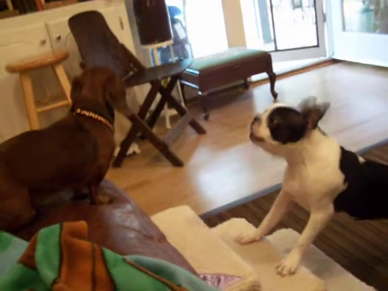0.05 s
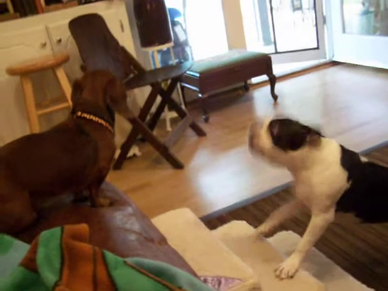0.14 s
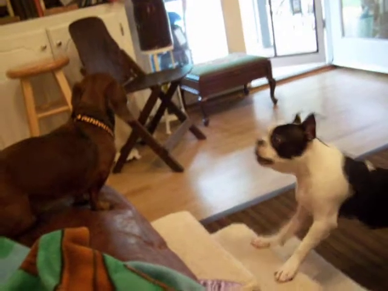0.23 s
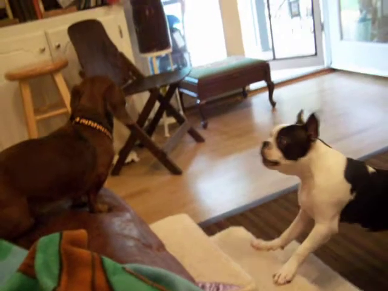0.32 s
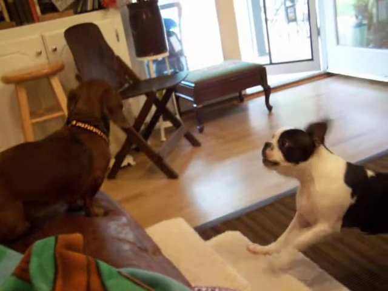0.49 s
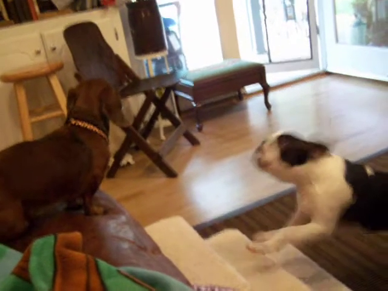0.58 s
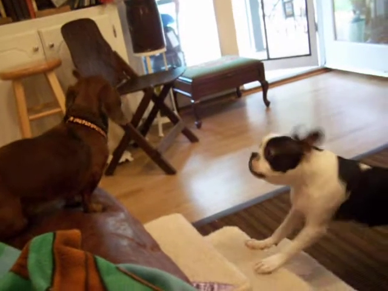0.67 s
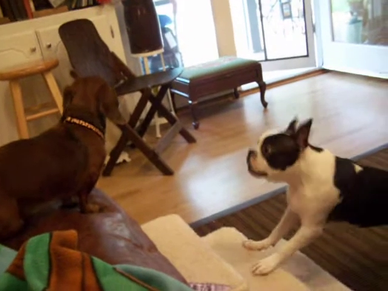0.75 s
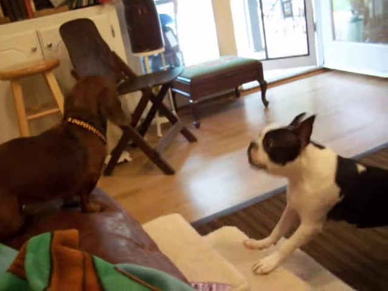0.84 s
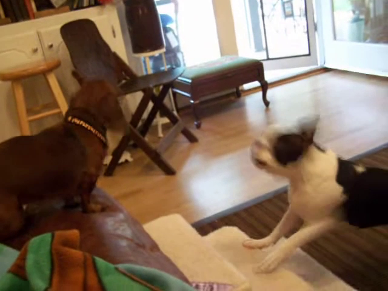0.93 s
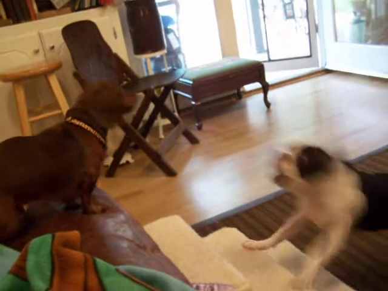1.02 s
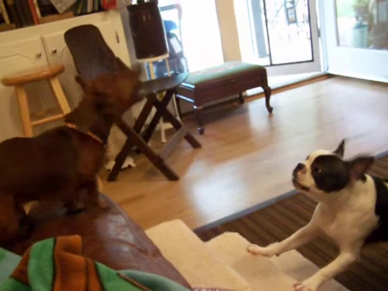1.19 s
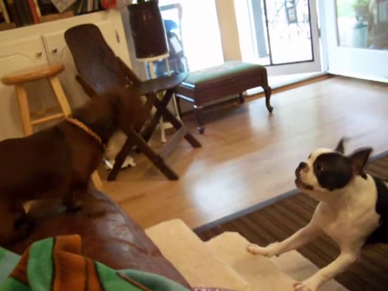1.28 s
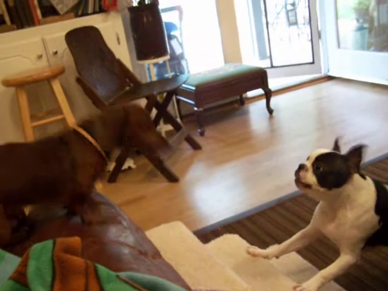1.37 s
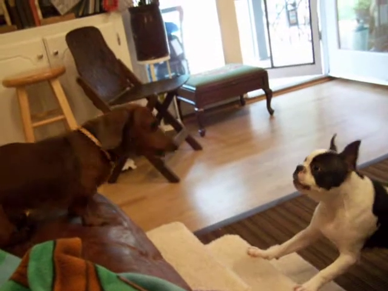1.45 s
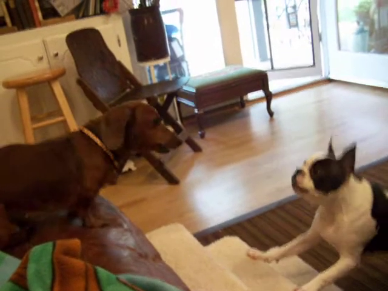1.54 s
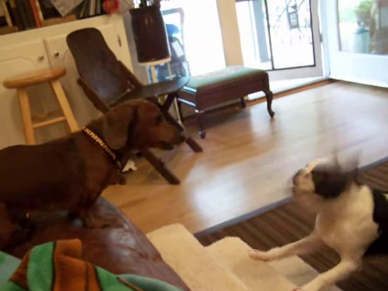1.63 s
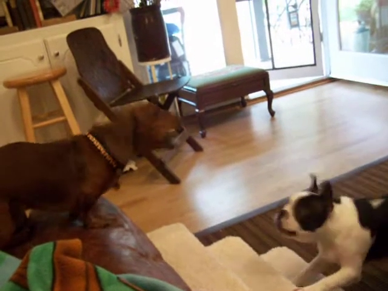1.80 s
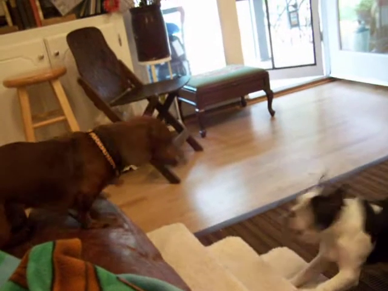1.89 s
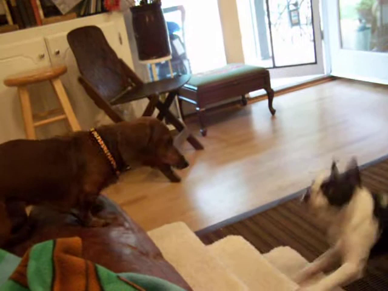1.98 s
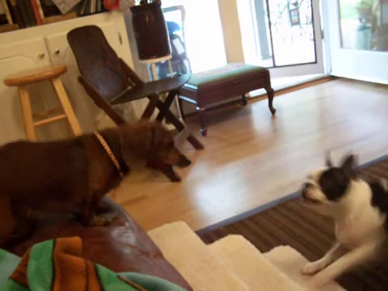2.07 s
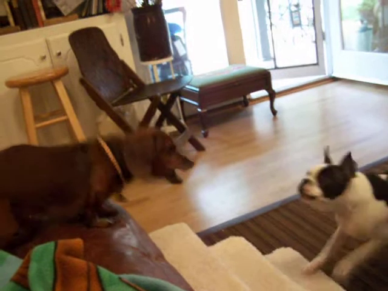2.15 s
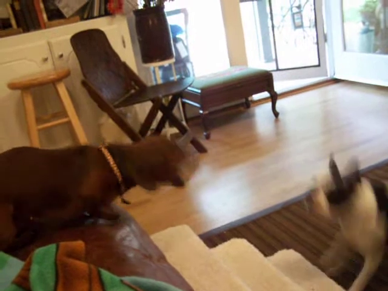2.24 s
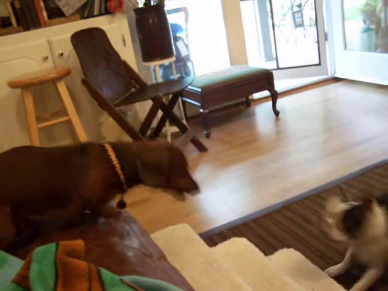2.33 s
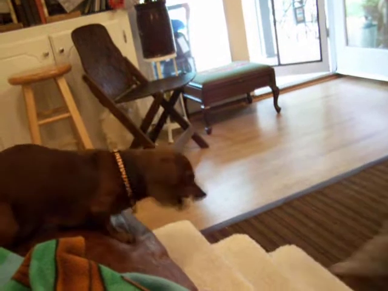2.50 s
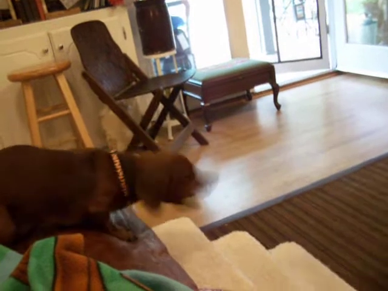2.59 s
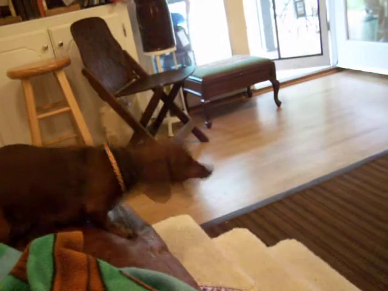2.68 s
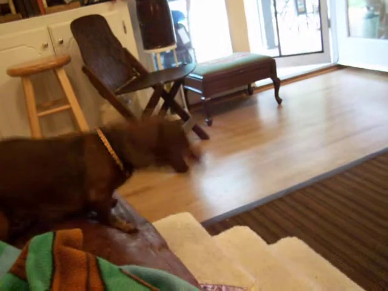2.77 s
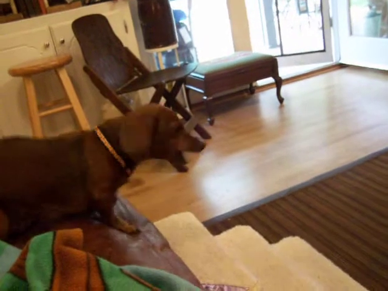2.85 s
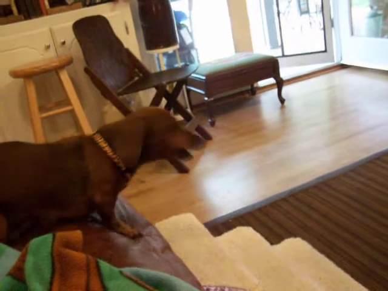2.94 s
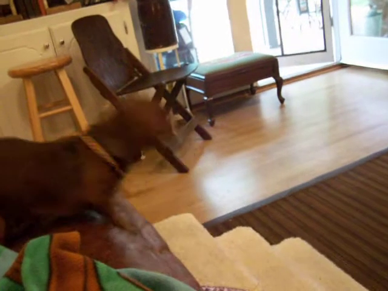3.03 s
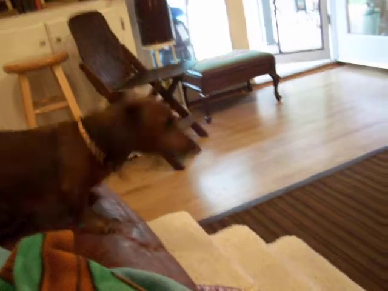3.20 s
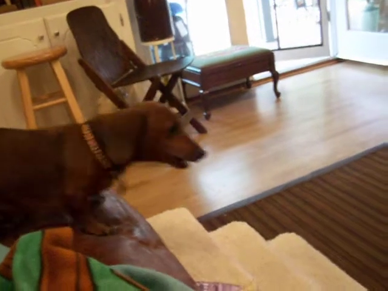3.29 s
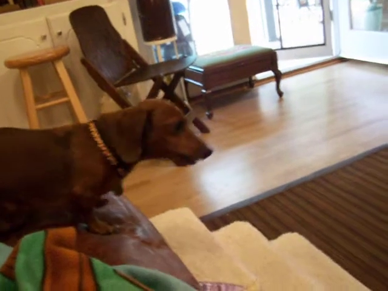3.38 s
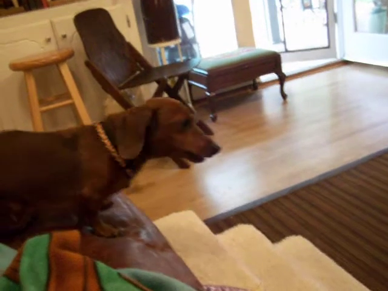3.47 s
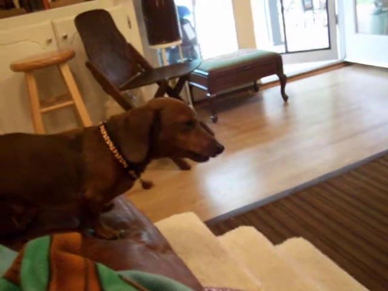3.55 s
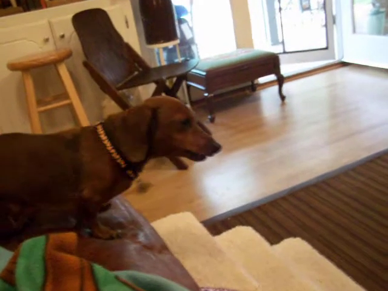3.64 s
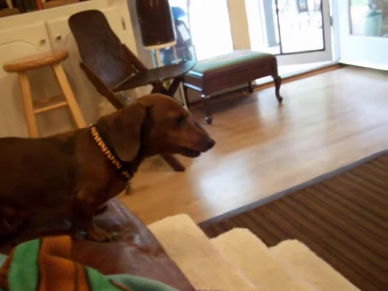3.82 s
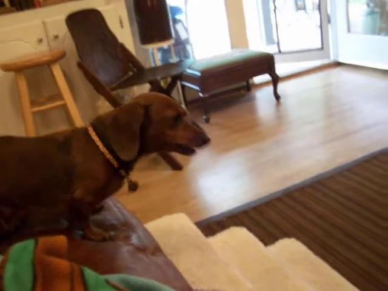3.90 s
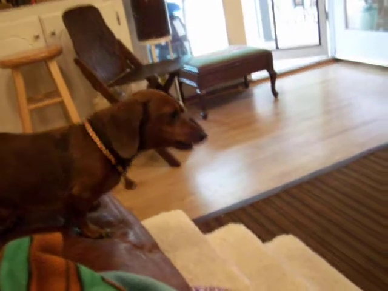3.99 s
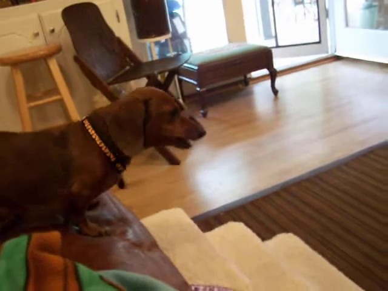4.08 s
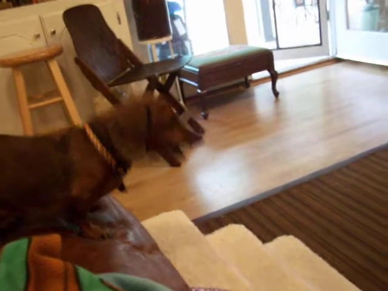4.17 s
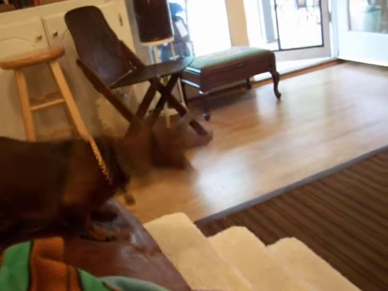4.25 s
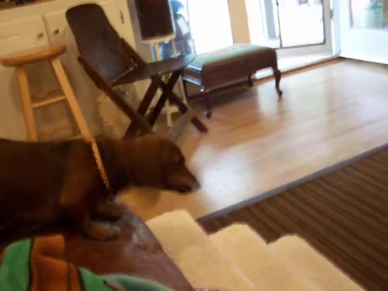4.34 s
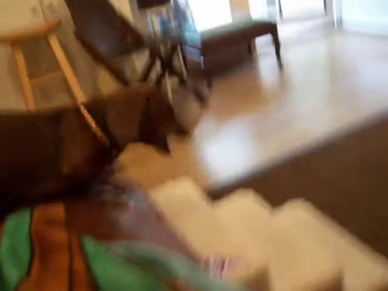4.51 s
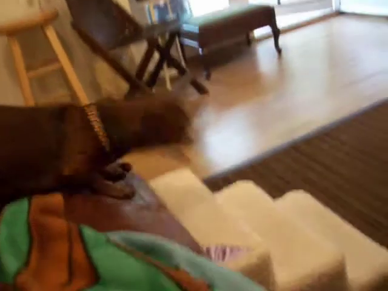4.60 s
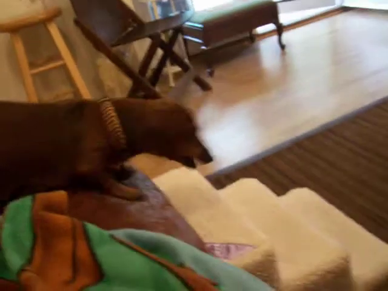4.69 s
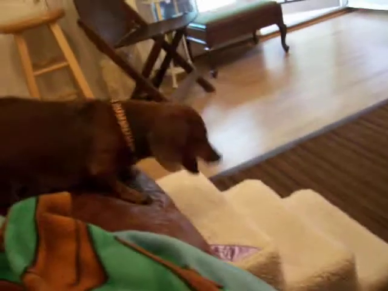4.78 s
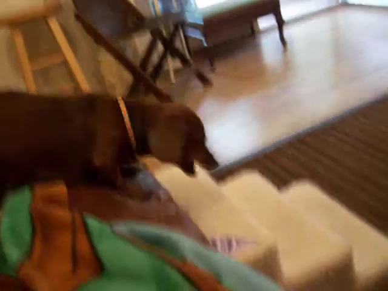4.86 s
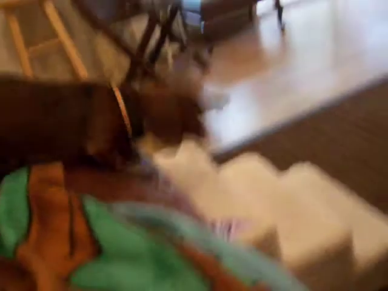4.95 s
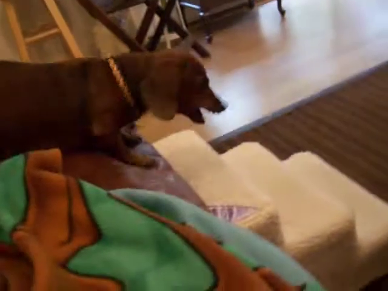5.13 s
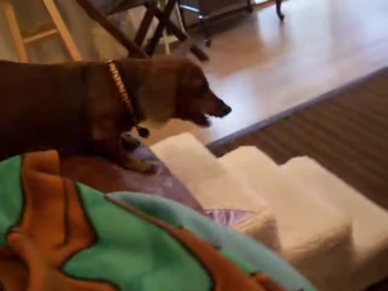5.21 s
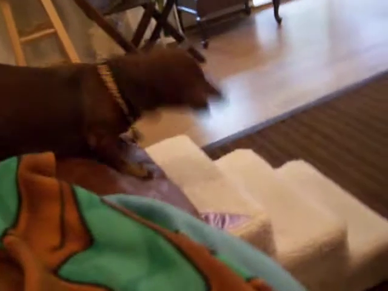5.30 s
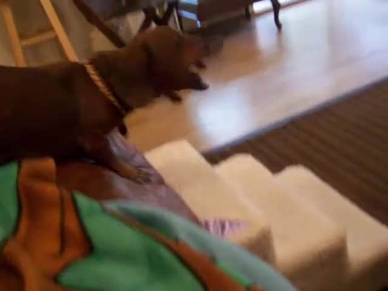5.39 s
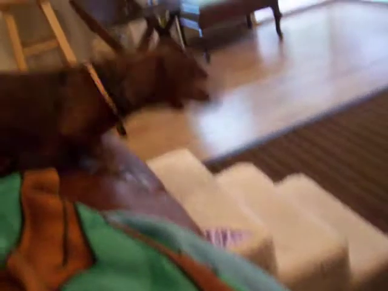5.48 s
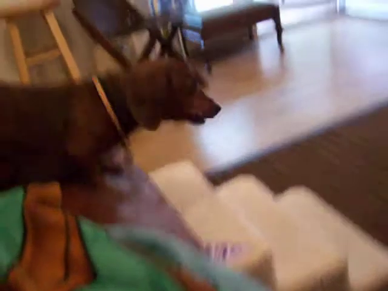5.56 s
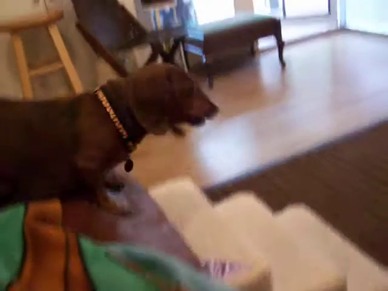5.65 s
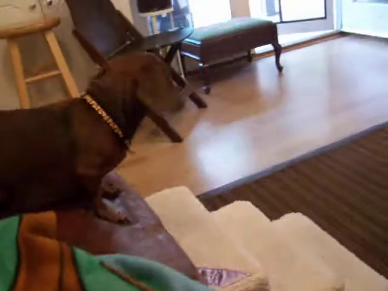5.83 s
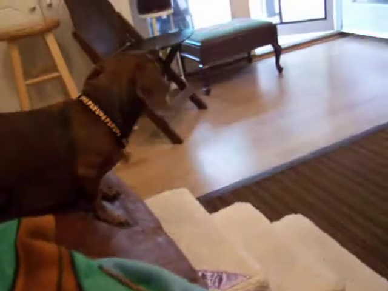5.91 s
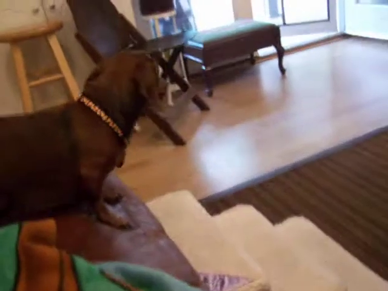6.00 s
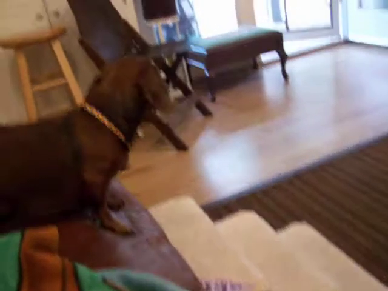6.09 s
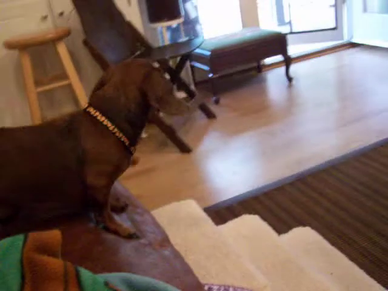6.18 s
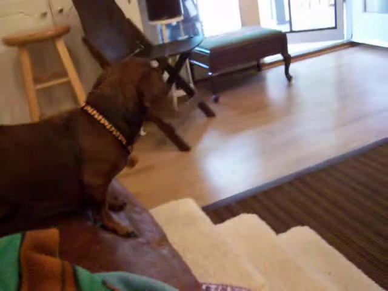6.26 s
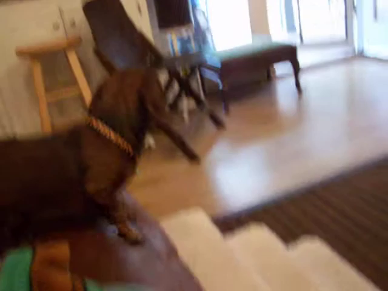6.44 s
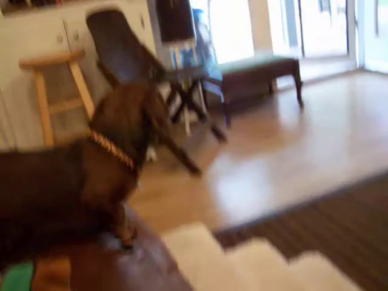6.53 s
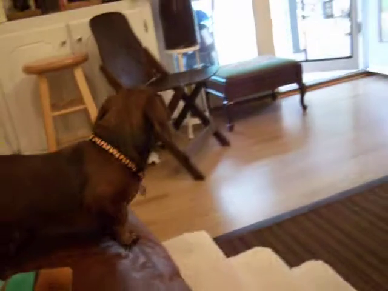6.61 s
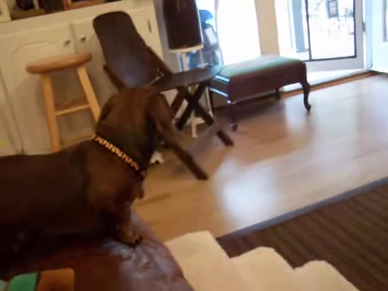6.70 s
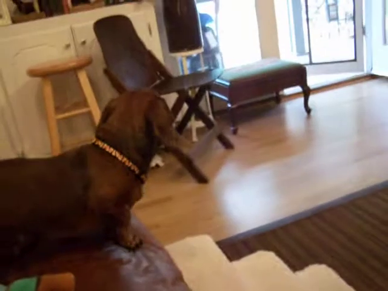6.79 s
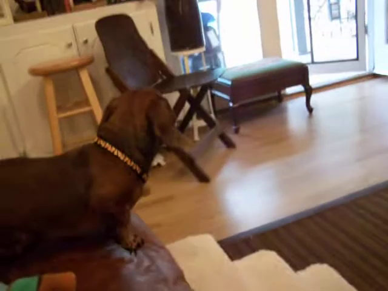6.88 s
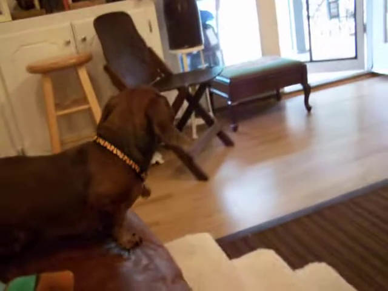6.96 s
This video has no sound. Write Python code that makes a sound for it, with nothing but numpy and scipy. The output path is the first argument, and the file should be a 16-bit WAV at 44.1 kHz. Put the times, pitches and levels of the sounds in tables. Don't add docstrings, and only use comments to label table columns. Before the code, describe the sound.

Playful dog exchange close to a small camera: rough, raspy barks alternate with bright, nearly whistled yelps, each rising suddenly and dropping off. The yelper pauses to growl softly, yelps through another round, and ends on a low throbbing growl with tiny soft paw thumps. The hard room rings after each cry; the sound is band-limited, slightly distorted, with background hum and hiss.

```python
import sys
import numpy as np
from scipy import signal
from scipy.io import wavfile
from scipy.ndimage import uniform_filter1d

SR = 44100
rng = np.random.default_rng(int(sys.argv[2]) if len(sys.argv) > 2 else 0)


def materialize(psi):
    bounded = np.clip(np.atleast_2d(psi).T, -1, 1)
    quanta = np.round(bounded * 32767).astype(np.int16)
    wavfile.write(sys.argv[1], SR, quanta)


def amplitude_ratio(level_db):
    exponent = np.asarray(level_db, float) / 20
    return 10 ** exponent


N = 310905


def evened(x):
    return x / np.sqrt(np.mean(x ** 2) + 1e-20)


def read(points, hz):
    f, value = np.transpose(points)
    return np.interp(np.log(hz + 1), np.log(f + 1), value)


def add(mix, start_s, sound):
    part = mix[round(start_s * SR):][:len(sound)]
    part += sound[:len(part)]


def wander(size, span):
    once = uniform_filter1d(rng.standard_normal(size), int(span))
    return evened(uniform_filter1d(once, int(span)))


def resonate(x, hz, width_hz):
    turn = np.exp(2j * np.pi * np.cumsum(hz * np.ones(len(x))) / SR)
    r = np.exp(-np.pi * width_hz / SR)
    smooth = signal.lfilter([(1 - r) ** 2], [1, -2 * r, r * r], x / turn)
    return 2 * (turn * smooth).real


def throat(drive, modes, mouth):
    total = 0
    for k, (hz, width_hz, db) in enumerate(modes):
        total = total + (-1) ** k * amplitude_ratio(db) / np.sqrt(width_hz) * resonate(drive, hz * mouth, width_hz)
    return total


def pulses(hz, jitter):
    turns = np.cumsum(hz * (1 + jitter * wander(len(hz), 80))) / SR
    clicks = np.diff(np.floor(turns), prepend=0)
    return turns, clicks * np.exp(0.04 * wander(len(hz), 27))


YELP_BEFORE_S, YELP_AFTER_S = .12, .23


def arch(murmur_s, reach_hz, top_hz, effort_db, murmur_db, tail_db):
    murmur_hz, snap_hz = 160.5, 479.6
    leap_s, creep_s, sung_s, drop_s = 0.019, .1, .118, .04
    t = np.arange(-YELP_BEFORE_S, YELP_AFTER_S, 1 / SR)
    before, after, late = np.minimum(t, 0), np.maximum(t, 0), np.maximum(t - sung_s, 0)
    climb = murmur_hz + (snap_hz - murmur_hz) * np.exp(before / min(0.47 * murmur_s, .03))
    leap = (reach_hz - snap_hz) * (1 - np.exp(-after / leap_s))
    rising_hz = climb + leap + (top_hz - reach_hz) * np.minimum(after / creep_s, 1)

    onset = np.clip((t + murmur_s) / 0.0041, 1e-4, 1)
    db = effort_db + 12 * np.log2(rising_hz / top_hz) + 20 * np.log10(onset)
    db = db + murmur_db * (1 - np.exp(before / leap_s))
    db = db - 12.5 * np.minimum(after / sung_s, 1) ** 2
    db = db + (tail_db - 32) * (1 - np.exp(-(late / .032) ** 2))

    droop = np.maximum(t - sung_s + .015, 0)
    hz = murmur_hz + (rising_hz - murmur_hz) / (1 + 1.6 * (droop / drop_s) ** 2)
    return uniform_filter1d(hz, size=250, mode="nearest"), uniform_filter1d(db, size=150, mode="nearest")


# pitch_hz, level_db
YELP_THROAT = [(100, 2), (400, -4), (750, -4.5), (980, 15), (1250, -8), (1600, 2), (2000, 2), (2400, -4),
               (2900, -10.5), (3400, -7.5), (4200, -10.5), (5000, -53.5), (7000, -30), (9000, -46.5)]
# pitch_hz, width_hz, level_db
MOUTH_AIR = [(1980, 2700, -15), (3660, 230, -0.5), (4300, 200, -37), (6940, 2200, -13)]


def mouth_air(turns, high, opening, grit_db):
    puffs = rng.standard_normal(len(turns)) * (0.83 + np.cos(2 * np.pi * turns))
    air = amplitude_ratio(-17) * evened(throat(puffs, MOUTH_AIR, 0.82))
    flare = np.exp(-((high - 0.61) / 0.15) ** 2)
    linger = signal.lfilter([1], [1, -np.exp(-1 / (0.019 * SR))], flare)
    twang = amplitude_ratio(-4.5) * evened(resonate(puffs, 603 + 676 * high, 120))
    grit = amplitude_ratio(-10) * evened(resonate(puffs, 3814, 970))
    air = air + amplitude_ratio(grit_db) * linger / linger.max() * (grit + twang)
    return air + amplitude_ratio(-13) * opening * evened(resonate(puffs, 9000 - 7000 * high, 970))


def yelp(hz, effort_db, flutter, tilt_db, second_db, grit_db):
    share, flutter_db, jitter = flutter
    turns = np.cumsum(hz * (1 + jitter * wander(len(hz), 90))) / SR
    k = np.arange(1, 16)[:, None]
    shut_db = .5 * np.clip(effort_db + 8, -40, 0)
    closed_db = shut_db * np.log2(k)
    high = np.maximum.accumulate(hz) / hz.max()
    opening = np.exp(-((high - .74) / 0.11) ** 2)

    bright_db = (tilt_db - 5 * opening) * np.maximum(np.log2(k / 2), 0)
    colour = amplitude_ratio(read(YELP_THROAT, k * hz) + closed_db + second_db * (k == 2) * high ** 4 + bright_db)
    drift = np.array([wander(len(hz), 40) for _ in k])
    breath = 1 + (.045 + .1 * opening) * k ** 1.4 * drift
    stack = (colour * breath * np.cos(2 * np.pi * (k * turns + rng.random(k.shape)))).sum(0)

    side_db = read(YELP_THROAT, (k + share) * hz) - 12 * abs(k - 1.6)
    sidebands = (amplitude_ratio(side_db) * np.cos(2 * np.pi * (k + share) * turns)).sum(0)
    voice = stack + amplitude_ratio(flutter_db + 4.5) * high ** 13 * sidebands
    voice = voice + mouth_air(turns, high, opening, grit_db) * amplitude_ratio(2 * closed_db[1])
    return amplitude_ratio(effort_db + 3.5 * high ** 6.6) * voice * signal.windows.tukey(len(hz), .08)


# snap_s (voice snaps up), murmur_s (before it), reach_hz (at once), top_hz, effort_db
YELPS = [
    (.936, 0.13, 752, 752, 1.5),
    (1.253, .022, 755, 755.5, -5.5),
    (1.867, 0.15, 782.4, 822, 1),
    (2.281, .022, 776, 852.4, 4),
    (2.686, 0.034, 817, 854.7, 1.5),
    (3.121, 0.095, 784.3, 805, 4),
    (4.308, .05, 775, 863, 0.5),
    (4.642, .025, 761.6, 871, 0),
    (5.019, 0.071, 788.3, 851.7, 0),
    (5.45, 0.082, 787.6, 821.4, 1.5),
]
# murmur_db, brightness_db_per_octave, second_harmonic_db, tail_db, grit_db
MANNERS = [(0.5, -3, 4.5, -2, -2), (-11, -1, 5.5, -22, -15), (-1, -1.5, 1.5, -7.5, 0),
           (-7.5, -0.5, -3.5, 9, 5), (0.5, -0.5, -0.5, -2, 6), (0, -2, 3, -2.5, -4), (5.5, 1, 0, -5, 2.5),
           (-2, -3.5, -4.5, 0, 6.5), (0.5, -1, -2.5, -1, 3.5), (1.5, -1.5, 0, 0, -0.5)]
# share_of_pitch, level_db, pitch_jitter (0-1)
FLUTTER = [(.37, -26, .004), (.365, -10, .003), (.37, -12, .006), (.33, -11, .016), (.33, -15, .016),
           (.37, -17, .005), (.35, -15, .008), (.36, -11, .014), (.385, -6, .008), (.39, -17, .005)]


def yelping():
    near = np.zeros(N)
    for (snap_s, *shape), manner, flutter in zip(YELPS, MANNERS, FLUTTER):
        murmur_db, tilt_db, second_db, tail_db, grit_db = manner
        hz, effort_db = arch(*shape, murmur_db, tail_db)
        sound = yelp(hz, effort_db, flutter, tilt_db, second_db, grit_db)
        add(near, snap_s - YELP_BEFORE_S, amplitude_ratio(-3.5) * sound)
    return near


def burst(effort_db, attack_s, hold_s, fall_db_per_s):
    t = np.arange(0, .19, 1 / SR)
    shut = np.maximum(1 - t / attack_s, 0) ** 2
    db = effort_db - 25 * shut - fall_db_per_s * np.maximum(t - attack_s - hold_s, 0)
    open_hz, shut_hz, sag_hz_per_s = 234.4, 150, 230
    hz = open_hz - (open_hz - shut_hz) * shut - sag_hz_per_s * t
    mouth = 1 - (1 - 0.502) * shut
    return db, hz, mouth


# pitch_hz, width_hz, level_db
BARK_THROAT = [(949, 108, 0), (760, 450, -10.5), (1153, 320, -6), (1830, 950, -11), (2610, 470, -10.5),
               (3980, 830, -18.5), (6500, 1600, -26.5)]


def bark(effort_db, hz, mouth, bright_db, rough=.4):
    turns, clicks = pulses(hz, jitter=.2)
    t = np.arange(len(hz)) / SR
    puffs = (.3 + np.exp(-(turns % 1) / .35)) * rng.standard_normal(len(hz))
    drive = (1 - rough) * evened(clicks) + rough * evened(puffs)
    upper = throat(drive, BARK_THROAT[3:], mouth * (1.073 - 1.3 * t))
    voice = throat(drive, BARK_THROAT[:3], mouth) - amplitude_ratio(bright_db - 40.5 * t) * upper
    return amplitude_ratio(effort_db) * evened(voice) * signal.windows.tukey(len(hz), .04)


# start_s, effort_db, attack_s, hold_s, fall_db_per_s
BARKS = [
    (0.139, 3, .04, 0.0023, 420),
    (0.601, 0, 0.0086, .002, 148),
    (1.058, -6, .05, .045, 494.5),
    (1.686, -6.5, .03, 0.045, 275),
    (4.151, -4, 0.028, 0.1, 423.5),
]
BARK_BRIGHT_DB = [2, 2, 1, 2.5, 0.5]


def barking():
    far = np.zeros(N)
    for (start_s, *shape), bright_db in zip(BARKS, BARK_BRIGHT_DB):
        add(far, start_s, bark(*burst(*shape), bright_db))
    return far


def played(rows, glide=250):
    s, *columns = np.transpose(rows)
    t = np.arange(s[0], s[-1], 1 / SR)
    return [uniform_filter1d(np.interp(t, s, c), int(glide), mode="nearest") for c in columns]


# pitch_hz, width_hz, level_db
GROWL_THROAT = [(346, 500, 1), (483, 350, -6.5), (847, 93, -9), (1410, 1400, -10.5), (2740, 440, -16),
                (4520, 1800, -13)]


def growl(rows, first_throbs, rough=0.6):
    effort_db, chest_hz, open_db = played(rows)
    size = len(chest_hz)
    throbs_hz = first_throbs + .25 * (chest_hz - chest_hz[0])
    turns = np.cumsum(throbs_hz * (1 + .03 * wander(size, 700))) / SR
    slaps = np.diff(np.floor(turns), prepend=0)
    hum = evened(resonate(slaps + .005 * rng.standard_normal(size), chest_hz, 34))
    clicks = pulses(chest_hz, jitter=.08)[1]
    throb = 2 + np.sin(np.pi * turns) ** 2
    drive = (1 - rough) * evened(clicks) + rough * rng.standard_normal(size)
    rasp = evened(throat(throb * drive, GROWL_THROAT, 0.92))
    nose = evened(resonate(rng.standard_normal(size), 7700, 1400))
    voice = hum + amplitude_ratio(open_db) * (rasp + amplitude_ratio(-25.5) * nose)
    return amplitude_ratio(effort_db) * voice * signal.windows.tukey(size, .04)


# time_s, effort_db, chest_ring_hz, mouth_opening_db
GROWLS = [
    [(3.48, -36, 167.1, -4.5), (3.62, -36, 166.4, 2), (3.82, -39, 179.3, -3.5), (3.93, -39.5, 185.4, 0),
     (3.97, -62, 184, -25), (4.13, -66, 188, -5)],
    [(6.17, -46, 163.6, -2), (6.22, -39, 163.5, 3), (6.36, -42, 165.3, 7.5), (6.43, -42, 154, -2.5),
     (6.82, -37, 150, -6), (6.9, -48.5, 146.8, -1), (7.05, -48, 146.5, -2)],
]
THROBS_PER_S = [24.5, 26]


def growling():
    low = np.zeros(N)
    for rows, throbs in zip(GROWLS, THROBS_PER_S):
        add(low, rows[0][0], amplitude_ratio(9) * growl(rows, throbs))
    return low


def slap(peak_db, ring_hz):
    u = np.arange(900) / SR * ring_hz
    return amplitude_ratio(peak_db) * 2.6 * np.sin(2 * np.pi * u) * u * np.exp(-u / .9)


# start_s, peak_db, ring_hz
SLAPS = [(0.011, -31, 425), (0.039, -29, 528), (0.05, -28, 423), (0.088, -29, 301), (0.099, -27, 433),
         (0.128, -25, 500), (.152, -17, 260), (.602, -14, 240), (1.69, -19, 260), (4.152, -15, 240),
         (3.849, -24, 339), (3.852, -24, 580), (6.66, -20, 937), (6.777, -20, 886), (6.97, -27, 554)]


def slapping():
    low = np.zeros(N)
    for start_s, peak_db, ring_hz in SLAPS:
        add(low, start_s, slap(peak_db, ring_hz))
    return low


# pitch_hz, time_to_fall_60_db_s
ROOM = [(150, 0.55), (400, 0.34), (800, 0.68), (2000, 0.78), (4000, 0.73), (8000, 0.52)]


def room(x, start=500):
    taps = np.zeros(SR)
    at = np.arange(0, SR - 20, 20)
    taps[at + rng.integers(0, 20, len(at))] = rng.choice([-1., 1.], len(at))
    hz, t, z = signal.stft(taps, SR, nperseg=256)
    tail = signal.istft(z * amplitude_ratio(-60 * t / read(ROOM, hz)[:, None]), SR, nperseg=256)[1]
    tail = tail * np.clip(np.arange(len(tail)) / start - 1, 0, 1)
    return signal.fftconvolve(x, tail / np.linalg.norm(tail))[:N]


# pitch_hz, level_db_per_hz
HISS = [(30, 4), (130, -17), (250, -23.5), (450, -9), (700, -18), (1500, -20), (2600, -21), (3200, -14.5),
        (4070, -14.5), (4800, -19.5), (6800, -30), (8450, -39)]


def hiss():
    frames, hz = N // 128 + 5, np.fft.rfftfreq(512, 1 / SR)
    a, b, patches = rng.standard_normal((frames, 257, 3)).T
    patches = evened(uniform_filter1d(uniform_filter1d(patches, 5, 0), 16, 1))
    z = (a + 1j * b) * amplitude_ratio(read(HISS, hz)[:, None] + 2.5 * patches)
    return amplitude_ratio(-38) * evened(signal.istft(z, nperseg=512, noverlap=384)[1][:N])


def scene():
    near, far = yelping(), barking()
    low = growling() + slapping()
    wet = room(amplitude_ratio(-5.5) * near + amplitude_ratio(-0.5) * far + amplitude_ratio(-11) * low)
    return (near + far + low + wet + hiss())[None]


def duck(x, knee_db, squeeze, recover_db, lag):
    power_db = 10 * np.log10(abs(uniform_filter1d(x[0] ** 2, 400)) + 1e-12)
    fall = np.arange(N) * recover_db / SR
    held_db = np.maximum.accumulate(power_db + fall) - fall
    over_db = np.maximum(held_db - knee_db, 0)
    late_db = np.interp(np.arange(N) - lag, np.arange(N), uniform_filter1d(over_db, 200))
    return x / amplitude_ratio(squeeze * late_db)


def roll_off(x):
    return signal.sosfilt(signal.butter(12, 15800, fs=SR, output="sos"), x)


def record(dry):
    band = signal.sosfilt(signal.butter(5, 125, "high", fs=SR, output="sos"), dry)
    lowpass = signal.firwin(201, 8350, window=("kaiser", 10), fs=SR)
    band = signal.oaconvolve(band, lowpass[None], "same")
    slow = duck(band, knee_db=-33.5, squeeze=0.27, recover_db=47, lag=303)
    quick = duck(slow, knee_db=-15.5, squeeze=0.9, recover_db=140.5, lag=665)
    swings = signal.sosfilt(signal.butter(2, 75.6, fs=SR, output="sos"), quick ** 2)
    lopsided = quick + 0.014 * quick ** 2 + .2 * swings
    overloaded = lopsided / (1 + (lopsided / .71) ** 8) ** (1 / 8)
    finished = signal.sosfilt(signal.butter(2, 26, "high", fs=SR, output="sos"), overloaded)
    return roll_off(finished)


dry = scene()
out = record(dry)
materialize(out)
```